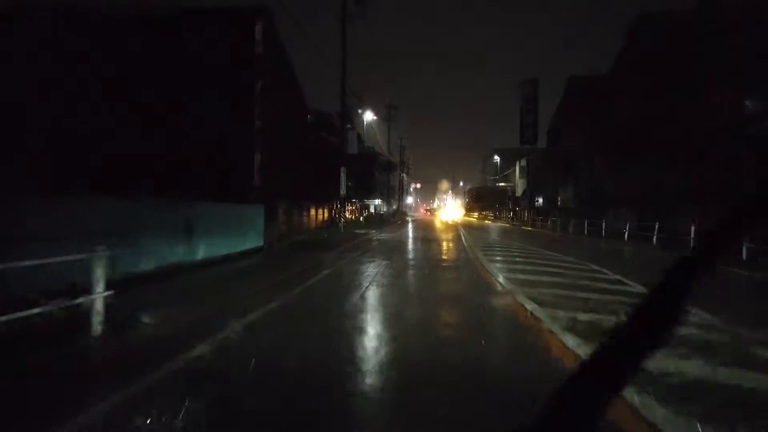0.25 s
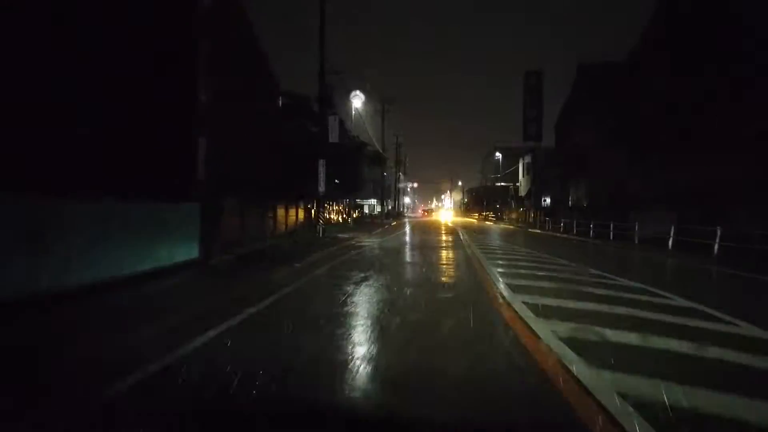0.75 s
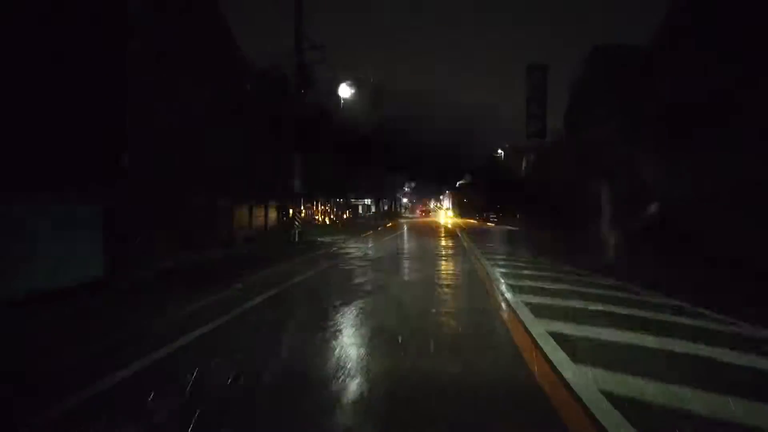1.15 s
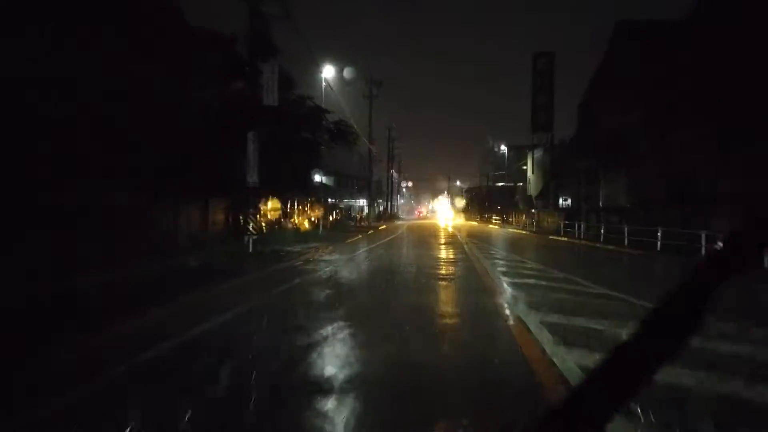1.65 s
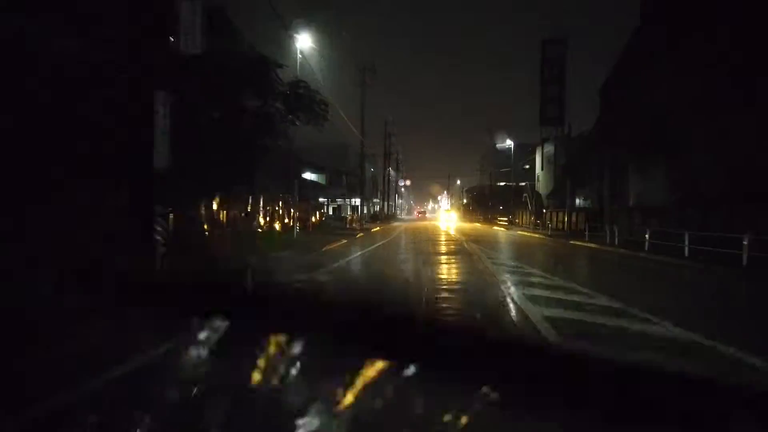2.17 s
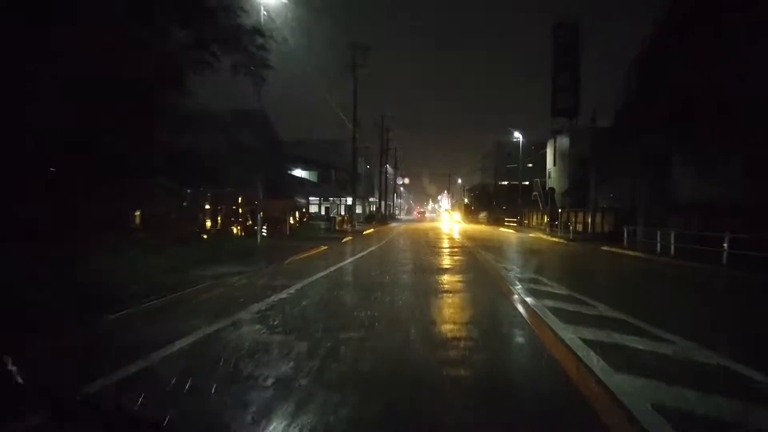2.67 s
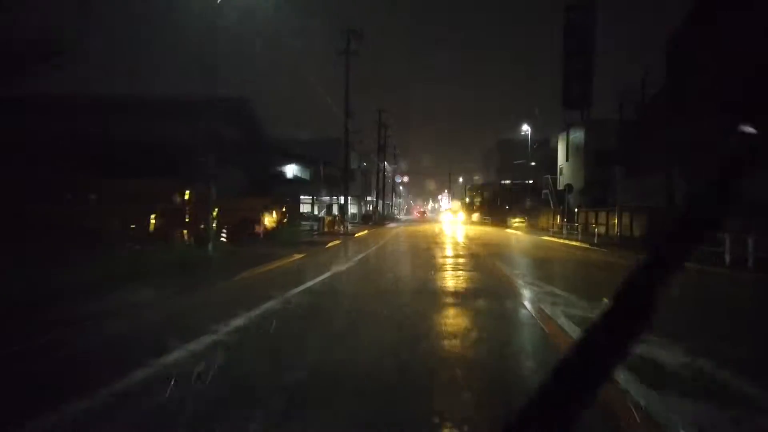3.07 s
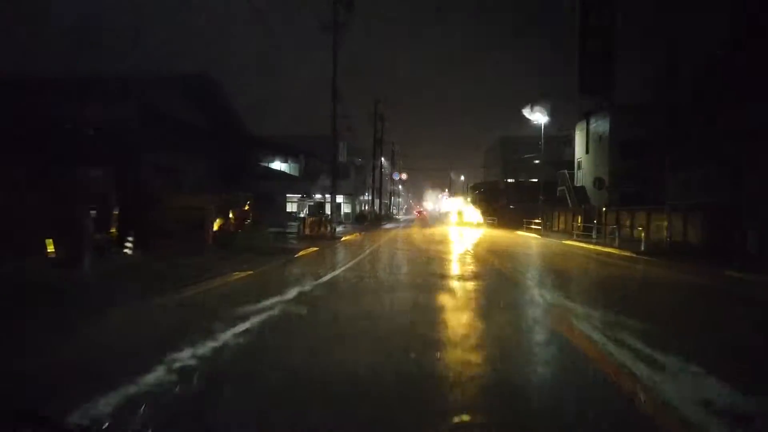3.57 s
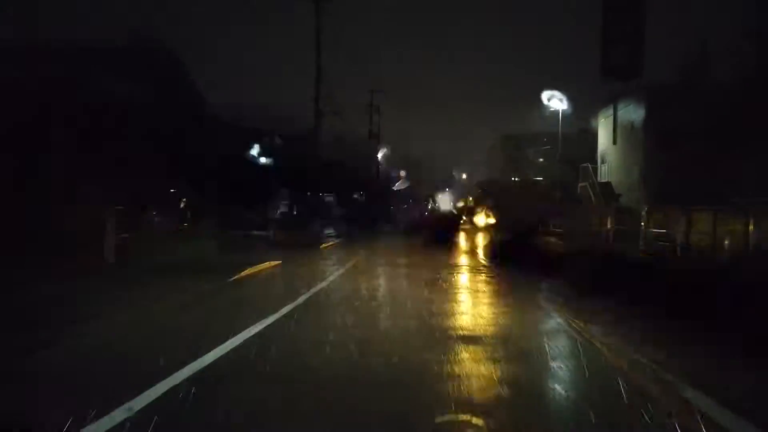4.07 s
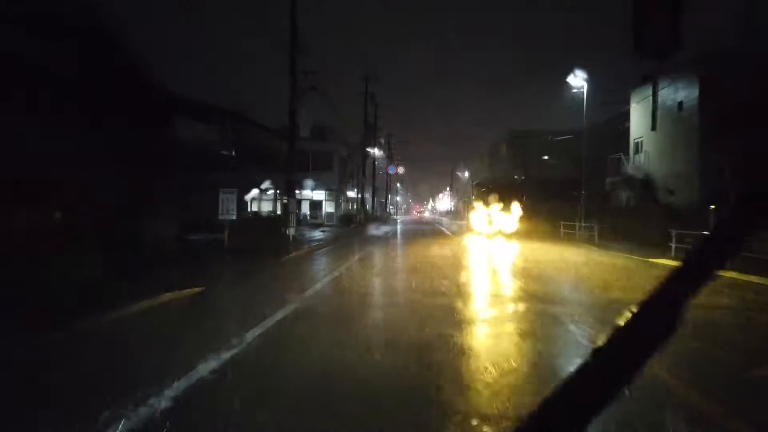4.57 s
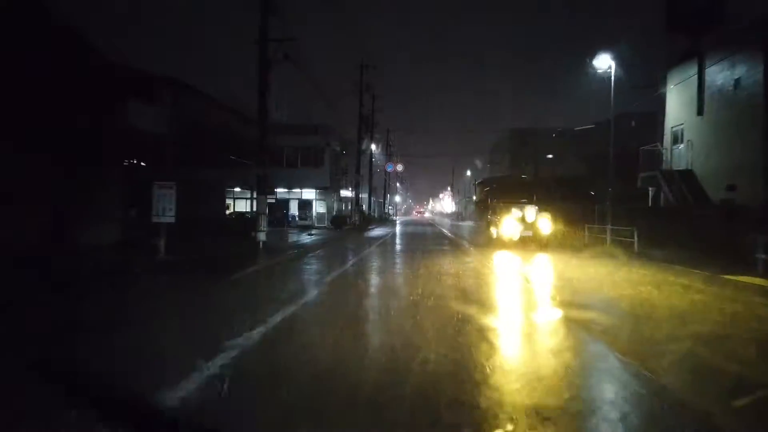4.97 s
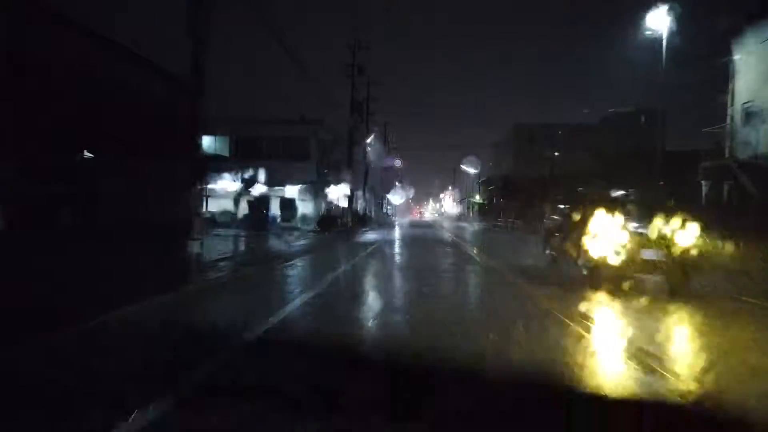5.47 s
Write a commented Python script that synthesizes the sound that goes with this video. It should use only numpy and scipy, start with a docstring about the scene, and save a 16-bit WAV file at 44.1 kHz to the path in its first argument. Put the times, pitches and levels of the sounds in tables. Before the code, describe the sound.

Heard inside a car driving steadily along a wet road at night, about 5.7 seconds, with no beginning or ending event. Heavy rain is continuous: dull, dense drumming on the roof, a soft thrum of its lining, and brighter patter and fine spatter on the windscreen, gusting in brief flurries, notably around 1.1, 2.4 and 4.8 s. Large drops make dry, very short, bright ticks at random, some close to the microphone, with many fainter ones between. Below, a nearly pure boom around 25 Hz wavers and thumps over bumps, strong at the start, up to about 3 s, calmer from 3.4 to 5 s, then swelling near 5.5 s. Muffled tyre and floor drone rises into short soft hums, notably at 2.8 and 3.05 s. Soft puddle bursts come near 1.1, 1.6, 2.1, 2.35, 2.7, 3.6, 4.8 and 5.6 s, several with hollow body slaps. Bass is centred; treble is wide.

```python
"""Heavy rain heard inside a car that drives steadily on a wet road.
Rain is a dense random train of impacts on roof and windscreen, each with a short decaying tail;
larger drops tick in short modes of the glass and one of the microphone, close to its two ports.
Beneath them lie a wavering low boom and shaped road noise that swells into short soft hums;
puddle water bursts as noise in the wheel arches and slaps the body as short groups of modes."""
import sys
import numpy as np
from scipy import signal
from scipy.fft import rfft, irfft, next_fast_len
from scipy.io import wavfile
from scipy.ndimage import uniform_filter1d

SR = 44100
rng = np.random.default_rng(int(sys.argv[2]) if len(sys.argv) > 2 else 0)


def output_pcm(signal):
    """Save a mono or channel-first signal as 16-bit PCM at the path in sys.argv[1].

    Samples are clipped to [-1, 1] before scaling.
    """
    pcm = np.clip(np.atleast_2d(signal).T, -1, 1) * 32767
    wavfile.write(sys.argv[1], SR, np.round(pcm).astype(np.int16))


N = 252693


def amp(db):
    """Logarithmic level: decibels to amplitude gain."""
    return 10 ** (np.asarray(db) / 20)


def evened(x):
    """Power normalisation: scales to rms 1."""
    return x / np.sqrt(np.mean(x ** 2) + 1e-20)


def slow_noise(width):
    """Low-pass smoothing: noise averaged twice over a width in samples, at rms 1."""
    once = uniform_filter1d(rng.standard_normal(N), width)
    return evened(uniform_filter1d(once, width))


def read(points, hz):
    """Spectral interpolation: reads a spectrum table on a log-frequency axis."""
    f, value = np.transpose(points)
    return np.interp(np.log(hz + 1), np.log(f + 1), value)


def follow(rows):
    """Linear interpolation in time: each column of a curve table at every sample."""
    s, *columns = np.transpose(rows)
    return [np.interp(np.arange(N) / SR, s, c) for c in columns]


# What differs between the ports over what they share, before the spread wavers: [f/Hz, level/dB]
APART_SPECTRUM = [(60, -29.5), (83, -20), (110, -32), (160, -35), (220, -40), (300, -24.5), (420, -26),
                  (580, -14.5), (810, -11.5), (1120, -12), (1540, -5), (2140, -5.5), (2960, -1.5),
                  (4090, -5.5), (5660, -2.5), (7830, -6.5), (10800, -1), (15000, 0)]
# Phase by which the left port leads the right: [f/Hz, phase/rad]
LEFT_LEAD = [(0, 0), (400, 0), (900, .1), (1290, .5), (1720, .3), (2240, 1.3), (3190, .3), (4220, 0),
             (9470, 0), (10600, .9), (14000, .1)]
SPREAD_WAVER_DB = 2.5  # rms swing of the stereo spread


def ports(a, b, colour):
    """Partial coherence: two unrelated signals mix to ports alike in the bass, apart in the treble."""
    size = next_fast_len(N + 8192)
    hz = np.fft.rfftfreq(size, 1 / SR)
    share = 1 / (1 + amp(read(APART_SPECTRUM, hz)) ** 2)
    wavering = evened(b * amp(SPREAD_WAVER_DB * slow_noise(2500)))
    together = rfft(a, size) * np.sqrt(share)
    apart = rfft(wavering, size) * np.sqrt(1 - share)
    turn = np.exp(.5j * read(LEFT_LEAD, hz))
    pair = np.array([(together + apart) * turn, (together - apart) / turn])
    return evened(irfft(pair * amp(read(colour, hz)), size)[:, :N])


def drops(colour, per_s, spread_db, t60, gust_db, count=7, size=4096):
    """Shot noise: random impacts of uneven size excite panel patches, each with its decaying tail."""
    sizes = np.minimum(rng.exponential(1, N), 5)
    blows = amp(spread_db * sizes + gust_db * slow_noise(900))
    blows *= rng.random(N) < per_s / SR
    blows = np.pad(blows, (0, -N % size)).reshape(-1, size)
    # fresh patches in every stretch of time, so that no one tail colours the whole
    patch = rng.integers(0, count, blows.shape) == np.arange(count)[:, None, None]
    decay = amp(-60 * np.arange(size // 2) / SR / t60)
    tails = rng.standard_normal((2, count, len(blows), size // 2)) * decay
    spectrum = (rfft(blows * patch, 2 * size) * rfft(tails, 2 * size)).sum(1)
    rung = irfft(spectrum, 2 * size)
    # each stretch rings on into the next
    rung[:, 1:, :size] += rung[:, :-1, size:]
    a, b = rung[:, :, :size].reshape(2, -1)[:, :N]
    return ports(evened(a), evened(b), colour)


# Bumps in the road jolt the body; the levels add in power to the rest level:
# [start t/s, boom peak level/dB, hold t/s, shudder peak level/dB]
ROAD_BUMPS = [(0.0, -8.5, 0.051, -20.5), (0.234, -10, 0.038, -19.5), (0.5, -13.5, 0.045, -42),
              (0.905, -17, 0.069, -26.5), (1.138, -11, 0.059, -29), (1.31, -15, 0.14, -23.5),
              (1.525, -11.5, 0.059, -22.5), (1.694, -36, 0.02, -23.5), (1.786, -16.5, 0.18, -27),
              (2.077, -13, 0.13, -31), (2.338, -13, 0.019, -29), (2.514, -16, 0.028, -24),
              (2.795, -11, 0.052, -23), (2.985, -10, 0.12, -20), (3.438, -18, 0.0081, -20.5),
              (3.575, -17, 0.055, -39), (3.801, -18, 0.093, -39), (3.984, -15.5, 0.012, -41),
              (4.143, -17.5, .02, -28), (4.3, -20, 0.038, -26), (4.517, -21, 0.077, -27.5),
              (4.711, -16.5, 0.023, -32), (4.974, -19, 0.053, -30), (5.222, -14.5, 0.11, -27),
              (5.456, -10.5, 0.016, -19), (5.58, -15.5, .12, -33)]
JOLT_S = 0.044  # rise time


def jolts(column, fade_db_per_s, rest_db):
    """Envelope superposition: bumps swell, hold and fade exponentially over a quiet rest."""
    t = np.arange(0, N + 64, 64) / SR
    row = np.transpose(ROAD_BUMPS)[:, :, None]
    since = t - row[0]
    rise = np.sin(np.pi / 2 * np.clip(since / JOLT_S, 0, 1)) ** 2
    fade_s = np.clip(since - JOLT_S - row[2], 0, 1)
    swells = rise * amp(row[column] - fade_db_per_s * fade_s)
    level = np.sqrt(amp(rest_db) ** 2 + (swells ** 2).sum(0))
    return np.interp(np.arange(N) / SR, t, level)


# Centre pitch of the boom, about which it wavers: [t/s, f/Hz]
BOOM_PITCH_CURVE = [(0, 24.92), (.75, 25.03), (.95, 27.34), (1.25, 25.23), (2.05, 25.13), (2.3, 26.35),
                    (3.45, 26.13), (3.7, 28.5), (4.05, 28.75), (4.3, 24.93), (4.6, 25.8), (5.73, 26.03)]


def boom():
    """Frequency modulation: a near-pure low tone wavers in pitch and swells over bumps."""
    waver_hz = 2.4 * slow_noise(2000)
    phase = 2 * np.pi * np.cumsum(follow(BOOM_PITCH_CURVE)[0] + waver_hz) / SR
    tone = np.sqrt(2) * np.sin(phase)  # rms 1
    return jolts(1, fade_db_per_s=115, rest_db=-27.5) * tone


# The road drone and tread noise wander in level; the drone gains further power from the shudder:
# [t/s, drone level/dB, tread noise level/dB]
ROAD_LEVELS = [(0, -26, -35), (.3, -32.5, -40), (.55, -29, -39), (.8, -31.5, -38), (1.05, -33, -40),
               (1.25, -28, -36.5), (1.42, -36, -41), (1.48, -40, -30), (1.56, -29.5, -46), (1.7, -30, -42),
               (1.95, -30.5, -42), (2.15, -32, -37), (2.45, -33, -43.5), (2.7, -33, -39),
               (3.05, -29.5, -41), (3.25, -34.5, -40), (3.7, -34.5, -45), (4.02, -35, -39.5),
               (4.3, -36.5, -39.5), (4.6, -30.5, -39.5), (4.95, -30.5, -38), (5.08, -32.5, -39),
               (5.15, -35, -40.5), (5.3, -34.5, -39), (5.48, -30.5, -38), (5.73, -33.5, -38.5)]
# Relative spectra of body shudder, road drone and tread noise: [f/Hz, level/dB per Hz]
SHUDDER_SPECTRUM = [(5, -39), (12, -5), (24, -21), (33, -2.5), (42, 1), (52, -0.5), (62, -6.5), (71, -16),
                    (90, -80), (300, -120)]
DRONE_SPECTRUM = [(30, -72), (60, -57), (72, -5.5), (88, 0), (97, -3.5), (106, 1), (126, -5), (153, 0),
                  (180, -5.5), (215, -17), (300, -31.5), (900, -120)]
TREAD_SPECTRUM = [(100, -54), (190, 0.5), (225, -3), (245, 1), (300, -2), (340, -5.5), (530, -21.5),
                  (620, -32), (1000, -19), (3000, -120)]
DRONE_JOLT_DB = -12  # how much of each shudder reaches the drone


def road():
    """Resonant filtering: random shaking takes the colours of floor and tyres."""
    drone_db, tread_db = follow(ROAD_LEVELS)
    shudder_level = jolts(3, fade_db_per_s=106, rest_db=-28)
    drone_level = np.hypot(amp(drone_db), amp(DRONE_JOLT_DB) * shudder_level)
    noise = rng.standard_normal((3, 2, N))
    shudder = shudder_level * ports(*noise[0], SHUDDER_SPECTRUM)
    drone = drone_level * ports(*noise[1], DRONE_SPECTRUM)
    tread = amp(tread_db) * ports(*noise[2], TREAD_SPECTRUM)
    return shudder + drone + tread


# The rumble dips briefly: [middle t/s, depth level/dB, 1/e half-width t/s]
RUMBLE_DIPS = [(1.485, -15, 0.016), (1.665, -2, 0.011), (2.07, -1, 0.019), (2.5, -3, 0.024),
               (2.71, -6, 0.025), (3.42, -0.5, 0.024), (4.45, -3, 0.029), (4.67, -2, 0.018),
               (5.15, -2, 0.029)]


def dips():
    """Amplitude modulation: Gaussian lulls in decibels give the gain of boom and road."""
    t = np.arange(N) / SR
    return amp(sum(depth_db * np.exp(-((t - s) / width) ** 2) for s, depth_db, width in RUMBLE_DIPS))


# The low road noise swells at odd moments into short soft hums: [middle t/s, f/Hz, peak level/dB]
ROAD_HUMS = [(0.064, 104, -23), (0.131, 162.5, -30), (0.217, 101, -25.5), (.356, 132, -28),
             (.443, 146, -24), (0.55, 109, -28), (0.676, 152, -30), (0.857, 96, -33), (0.872, 159, -26),
             (0.964, 108, -28), (.78, 165, -30), (1.161, 151.5, -22.5), (1.215, 178, -28.5),
             (1.313, 113.5, -23.5), (1.529, 96.5, -26.5), (1.67, 113, -23.5), (1.681, 150, -27),
             (1.784, 105, -24), (1.785, 161, -31), (1.908, 140.5, -29.5), (1.995, 138, -26),
             (2.402, 99, -36), (2.569, 88, -28), (2.707, 88.5, -25), (2.843, 102.4, -18.5),
             (3.048, 148.5, -20.5), (3.056, 118.4, -20.5), (3.244, 153.1, -37), (3.351, 159.9, -29.5),
             (3.699, 149, -30), (3.911, 141.9, -32), (4.1, 165.3, -36), (4.35, 175.5, -31),
             (4.57, 81.6, -32), (4.593, 146, -30), (4.76, 162, -31.5), (4.861, 143.1, -26),
             (4.955, 155, -23), (5.071, 121, -26.5), (5.303, 88.34, -26), (5.487, 82.6, -20.5),
             (5.485, 115, -21), (5.581, 149.5, -28), (5.703, 142, -30)]
HUM_S = 0.038  # 1/e half-width


def hums():
    """Gaussian tone bursts: short soft swells of low tone, alike at both ports."""
    t = np.arange(-3 * HUM_S, 3 * HUM_S, 1 / SR)
    swell = np.exp(-(t / HUM_S) ** 2)
    margin = SR // 2  # room for hums that overlap either end
    out = np.zeros(N + SR)
    for (s, hz, peak_db), turn in zip(ROAD_HUMS, rng.random(len(ROAD_HUMS))):
        at = round((s + t[0]) * SR) + margin
        out[at:at + len(t)] += amp(peak_db) * swell * np.sin(2 * np.pi * (hz * t + turn))
    return out[margin:margin + N]


# Puddles thrown against the wheel arches: [start t/s, peak level/dB, time to the peak t/s]
PUDDLE_SPLASHES = [(1.09, -41, 0.017), (1.62, -43.5, 0.034), (2.14, -46, 0.024), (2.35, -37, 0.025),
                   (2.73, -48, 0.016), (3.62, -41.5, 0.024), (4.76, -41.5, 0.038), (5.6, -51, 0.06)]
# Relative spectrum of the arches: [f/Hz, level/dB per Hz]
ARCH_SPECTRUM = [(300, -28), (500, -4.5), (740, -7), (900, -14), (1100, -3.5), (1280, -17), (1480, -7.5),
                 (1620, -23), (1900, -10), (2300, -15), (5000, -33), (9000, -70)]


def splashes():
    """Enveloped shot noise: bursts of spray swell softly and die away, adding in power."""
    t, power = np.arange(N) / SR, np.zeros(N)
    for s, peak_db, rise in PUDDLE_SPLASHES:
        u = np.maximum(t - s, 0) / rise
        power += (amp(peak_db) * u * np.exp(1 - u)) ** 2
    return np.sqrt(power) * drops(ARCH_SPECTRUM, per_s=7000, spread_db=1.6, t60=.04, gust_db=.3)


# Slabs of water slap the body; levels before a random scatter: [start t/s, base level of modes/dB,
# pitch as a share of the modes, time to the peak t/s, trapped water f/Hz, its level/dB]
WATER_SLAPS = [(2.145, -40, 0.98, .019, 1535, -42.5), (2.346, -35.5, 1.1, 0.014, 1446, -44),
               (2.39, -49, 1.1, 0.018, 1940, -46), (2.745, -41.5, 1, 0.016, 1410, -40.5),
               (4.752, -46, 0.73, 0.017, 1730, -49), (4.792, -42.5, 0.97, 0.028, 1373, -54)]
# Modes of the slapped panel, scaled in pitch and level by each slap: [f/Hz, level/dB]
SILL_MODES = [(500, -14), (785, -4.5), (990, -5), (1250, -16.5), (1800, -18)]
SILL_SCATTER, SILL_SCATTER_DB = .006, 1  # rms detuning as a share of pitch; rms level scatter


def slaps():
    """Modal synthesis: panel modes and one ring of trapped water swell quickly and die."""
    out = np.zeros((2, N))
    hz, db = np.transpose(SILL_MODES)
    draws = rng.standard_normal((len(WATER_SLAPS), 4, len(SILL_MODES) + 1, 1))
    for (s, peak_db, share, rise, ring_hz, ring_db), draw in zip(WATER_SLAPS, draws):
        t = np.arange(0, 8 * rise, 1 / SR)
        detune, scatter, turn, skew = draw
        level_db = np.r_[peak_db + db, ring_db][:, None] + SILL_SCATTER_DB * scatter
        size = amp(level_db) * t / rise * np.exp(1 - t / rise)
        pitch = np.r_[hz * share, ring_hz][:, None] * (1 + SILL_SCATTER * detune)
        phase = 2 * np.pi * (pitch * t + turn)
        pair = [(size * np.sin(phase + 0.22 * side * skew)).sum(0) for side in (-1, 1)]
        out[:, round(s * SR):][:, :len(t)] += pair
    return out


# The loudest large drops on the glass, before the arrival gains:
# [t/s, peak level/dB, relative level of the deeper modes/dB]
LARGE_DROPS = [(.0548, -28, 0), (.099, -30, -4), (.626, -45, -8), (.8345, -34, -12), (.9533, -42, -8),
               (.985, -30, -8), (1.0426, -30, -5), (1.065, -30, -8), (1.1929, -30, -2), (1.3045, -34, 2),
               (1.4112, -42, -6), (1.4903, -43, -6), (1.7183, -39, -10), (1.8157, -29.5, -10),
               (1.9936, -31, 8), (2.0676, -37, -10), (2.2295, -35, -8), (2.4066, -39, -8),
               (2.4813, -31, -7), (2.6775, -34, -9), (2.7774, -36, -8), (2.8191, -39, -6), (2.829, -29, -8),
               (3.0145, -38, -4), (3.0662, -43, -12), (3.1987, -39, -15), (3.2884, -43, -8),
               (3.4081, -28, 6), (3.4966, -37, -3), (3.5699, -35, -14), (3.6169, -36, -6),
               (3.6758, -26.5, -3), (3.771, -28, -4), (3.7819, -41, -6), (3.9425, -38, -8),
               (4.0197, -41, -6), (4.1454, -40, -6), (4.7101, -41, -6), (4.7717, -32, -1),
               (4.8421, -41, -10), (4.9383, -29, -5), (5.0428, -35, -12), (5.0642, -30, -11),
               (5.1649, -30, -5), (5.712, -32, -2)]
# Modes of the ticks, from the glass and, at 10300 Hz, the microphone; before each drop's scatter:
# [f/Hz, relative level/dB, t60/s]
TICK_MODES = [(3930, -6, .004), (6800, -2, .003), (8400, -2, .002), (9500, -3, .002), (10300, -2, .0035),
              (11500, 0, .0025), (12800, -2, .0025), (14200, -17, .002)]
DEEP_HZ = 9000
MODE_SCATTER_DB = 6  # each drop favours other modes, by up to this either way
SMALL_PER_S, SMALL_DB, SMALL_SPREAD_DB = 45, -47, 5  # lesser drops: mean rate, middle peak, half-range


def ticks():
    """Impulse response: each drop excites short decaying modes; faint reflections follow from the cabin."""
    t, out = np.arange(600) / SR, np.zeros((2, N + 1000))
    # exponential gaps place the lesser drops at random moments
    when, size = rng.random((360, 2)).T
    moments = np.cumsum(-np.log(1 - when) / SMALL_PER_S)
    small = np.c_[moments, SMALL_DB + SMALL_SPREAD_DB * (2 * size - 1), -12 * size]
    rows = LARGE_DROPS + [row for row in small if row[0] < N / SR]
    chance = rng.random((len(rows), 3 * len(TICK_MODES)))
    hz, db, t60 = np.transpose(TICK_MODES)[:, :, None]
    onset = 1 - np.exp(-t / 0.00022)
    for (s, peak_db, deep_db), draw in zip(rows, chance):
        turns, skew, favour = draw.reshape(3, -1, 1)
        mode_db = db + MODE_SCATTER_DB * (2 * favour - 1) + deep_db * (hz < DEEP_HZ)
        envelope = amp(mode_db - 60 * t / t60) * onset
        # the modes start nearly together; the two ports catch them at slightly different phases
        cycles = hz * t + 0.27 * turns
        ring = np.array([(envelope * np.sin(2 * np.pi * (cycles + 0.15 * side * skew))).sum(0)
                         for side in (-1, 1)])
        ring *= amp(peak_db) / abs(ring).max()
        # direct sound, then two reflections: delay in s, gain in dB
        for delay, gain_db in ((0, -0.5), (.0022, -19), (.0051, -14)):
            at = round((s + delay) * SR)
            out[:, at:at + len(t)] += amp(gain_db) * ring
    return out[:, :N]


# The roof lining thrums under drops: [t/s, level/dB]
THRUM_LEVEL = [(0.0, -42), (0.16, -49), (2.22, -46), (2.36, -42), (2.41, -46.5), (3.35, -45.5), (3.42, -52),
               (3.45, -49.5), (5.49, -46), (5.73, -48)]
# Relative spectrum of the lining: [f/Hz, level/dB per Hz]
LINING_SPECTRUM = [(280, -31), (380, -1.5), (450, -3.5), (530, 0), (600, -10), (800, -39.5)]


def thrum():
    """Resonant shot noise: drops sound through the low band of the roof lining."""
    lining = drops(LINING_SPECTRUM, per_s=3000, spread_db=2.0, t60=0.06, gust_db=0.8)
    return amp(follow(THRUM_LEVEL)[0]) * lining


# Spatter on the glass between flurries: [t/s, level/dB]
SPATTER_LEVEL = [(0, -49.5), (.3, -54), (.6, -54), (.95, -50.5), (1.4, -50), (1.6, -52), (1.85, -49),
                 (2.55, -50.5), (2.8, -49), (3.2, -51.5), (3.7, -50), (3.9, -52), (4.5, -50.5),
                 (4.9, -50.5), (5.3, -48), (5.55, -53), (5.73, -48)]
# Flurries of rain blown against the glass, added in power:
# [middle t/s, peak level/dB, 1/e half-width of the power t/s]
RAIN_FLURRIES = [(.09, -63, 0.017), (.43, -53, .02), (1.07, -48.5, 0.045), (1.2, -55, 0.024),
                 (1.31, -50, 0.013), (1.74, -56, 0.046), (2.04, -50, 0.041), (2.4, -48.5, 0.092),
                 (2.83, -51, 0.036), (3.03, -52, 0.027), (3.42, -59, 0.017), (3.78, -62, 0.027),
                 (4.15, -53, 0.027), (4.79, -45, 0.032), (4.94, -52, .02), (5.07, -50, 0.028),
                 (5.2, -50, 0.051), (5.71, -57, .03)]


def spatter_level():
    """Addition of powers: the amplitude of the spatter swells with each flurry."""
    t, power = np.arange(N) / SR, amp(follow(SPATTER_LEVEL)[0]) ** 2
    for s, peak_db, width in RAIN_FLURRIES:
        power += amp(peak_db) ** 2 * np.exp(-((t - s) / width) ** 2)
    return np.sqrt(power)


# Patter on the glass, before it follows the spatter: [t/s, level/dB]
PATTER_LEVEL = [(0, -50), (.8, -52.5), (1.6, -49.5), (2.5, -51), (3.6, -50.5), (4.5, -51.5), (5.2, -50.5),
                (5.73, -51.5)]
# Relative spectra of patter and spatter: [f/Hz, level/dB per Hz]
PATTER_SPECTRUM = [(1200, -22), (2000, 0.5), (2800, 2), (4000, -3.5), (5500, -11.5), (8000, -34)]
GLASS_SPECTRUM = [(1200, -43), (3000, -0.5), (5300, 1), (6900, 0), (9000, -0.5), (10300, 1), (11200, -2.5),
                  (13000, -8.5), (14300, -17), (15600, -21)]
PATTER_FOLLOWS = 0.27  # share of the spatter's swings in dB that the patter follows
SPATTER_MEAN_DB = -50  # spatter level that leaves the patter unchanged


def windscreen():
    """Band-limited shot noise: sharp spatter and lower patter strike the glass ahead."""
    spatter = drops(GLASS_SPECTRUM, per_s=4000, spread_db=0.9, t60=0.024, gust_db=0.92)
    patter = drops(PATTER_SPECTRUM, per_s=900, spread_db=1.5, t60=0.03, gust_db=2.1)
    level = spatter_level()
    swing = (level / amp(SPATTER_MEAN_DB)) ** PATTER_FOLLOWS
    return level * spatter + amp(follow(PATTER_LEVEL)[0]) * swing * patter


# Drumming on the roof: [t/s, level/dB]
DRUMMING_LEVEL = [(0.0, -42), (0.67, -43.5), (1.16, -40), (1.43, -42), (2.47, -40), (3.3, -42.5),
                  (5.06, -40.5), (5.39, -41.5), (5.73, -40.5)]
# Relative spectrum of the roof: [f/Hz, level/dB per Hz]
ROOF_SPECTRUM = [(260, -12), (450, -10), (525, -9.5), (613, -2.5), (773, -1), (1040, -2.5), (1300, -3),
                 (1790, -0.5), (2250, -9.5), (2730, -8), (3600, -13), (5000, -20), (7000, -31),
                 (12000, -90)]


def roof():
    """Dense shot noise: overlapping impacts merge into dull drumming overhead."""
    drumming = drops(ROOF_SPECTRUM, per_s=6000, spread_db=2.0, t60=0.062, gust_db=-0.26)
    return amp(follow(DRUMMING_LEVEL)[0]) * drumming


def scene():
    """Linear superposition: everything that sounds in the cabin adds together."""
    rumble = dips() * (boom() + road())
    water = splashes() + slaps()
    rain = ticks() + thrum() + windscreen() + roof()
    return rumble + hums() + water + rain


def record(dry):
    """Linear-phase low-pass filtering: the band limit of the recorder."""
    edge_hz = 15750
    low_pass = signal.firwin(1023, edge_hz, window=("kaiser", 10), fs=SR)
    return signal.oaconvolve(dry, low_pass[None], "same")


dry = scene()
out = record(dry)
output_pcm(out)
```